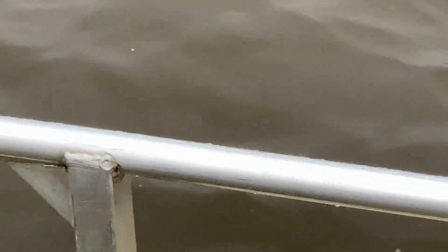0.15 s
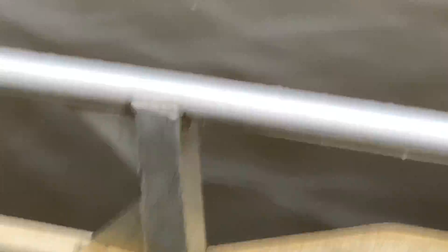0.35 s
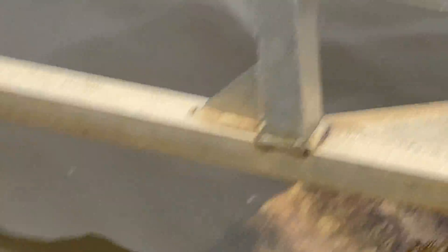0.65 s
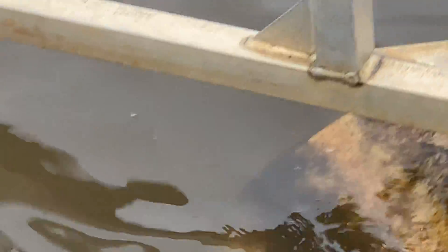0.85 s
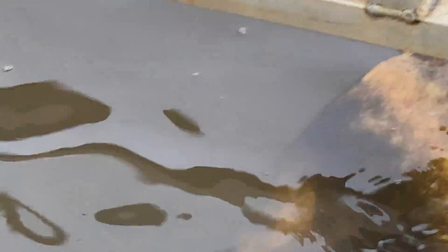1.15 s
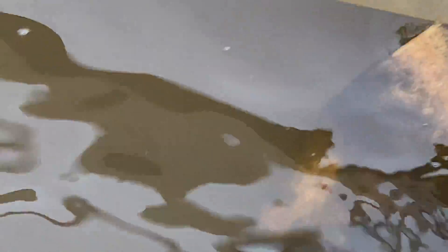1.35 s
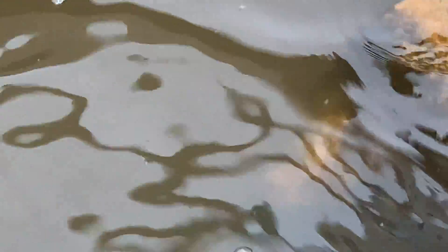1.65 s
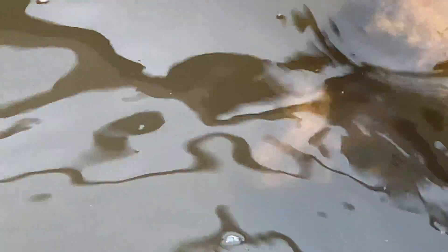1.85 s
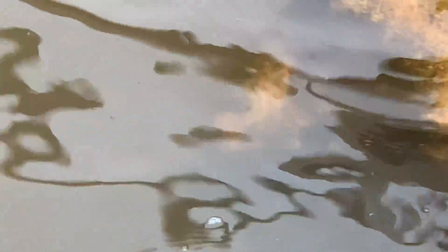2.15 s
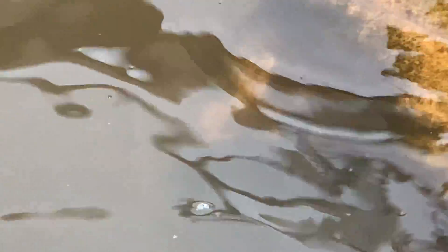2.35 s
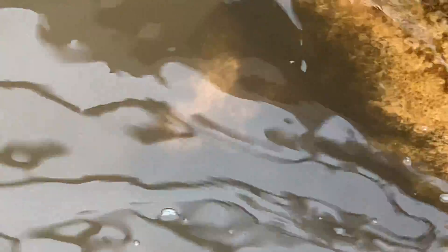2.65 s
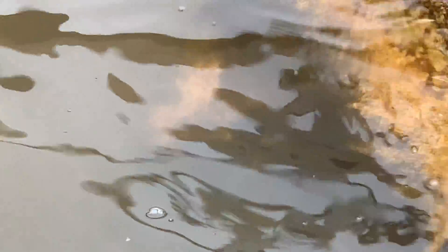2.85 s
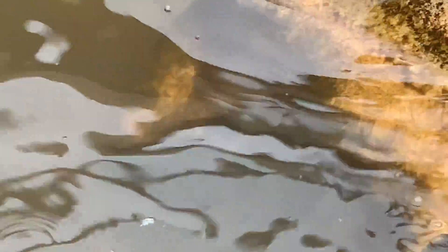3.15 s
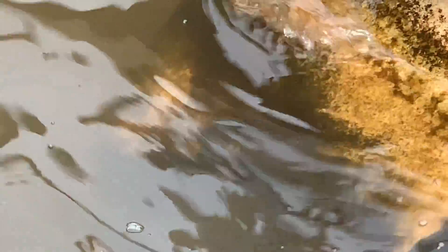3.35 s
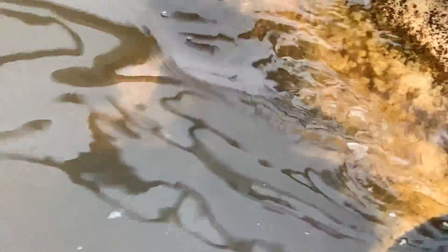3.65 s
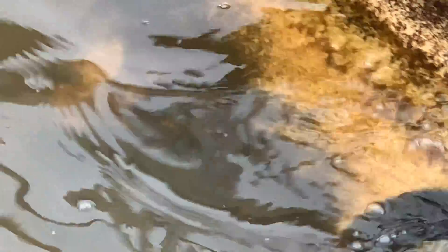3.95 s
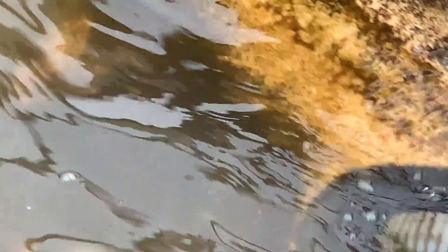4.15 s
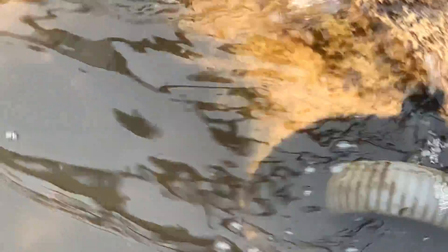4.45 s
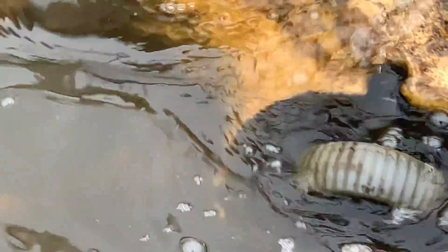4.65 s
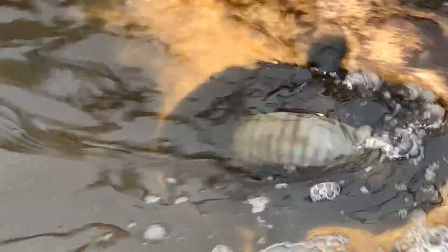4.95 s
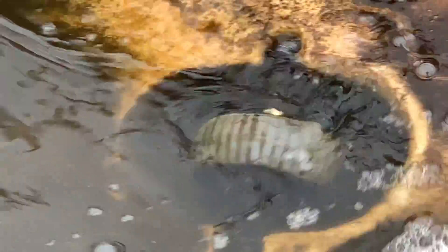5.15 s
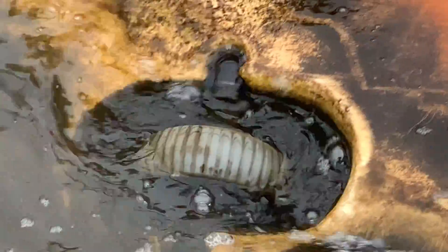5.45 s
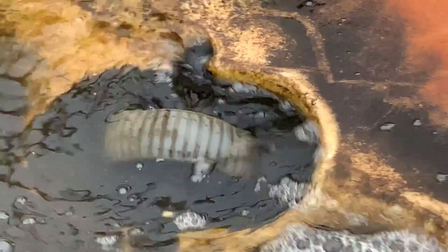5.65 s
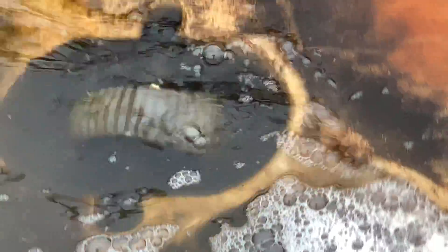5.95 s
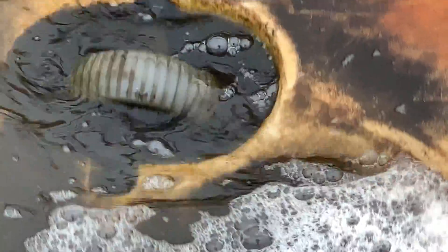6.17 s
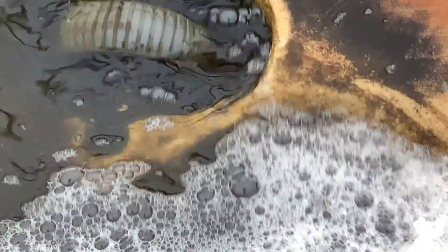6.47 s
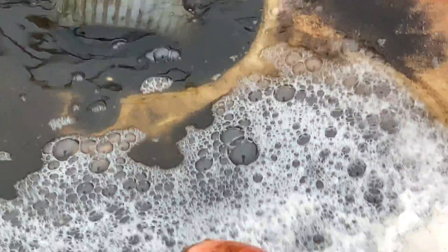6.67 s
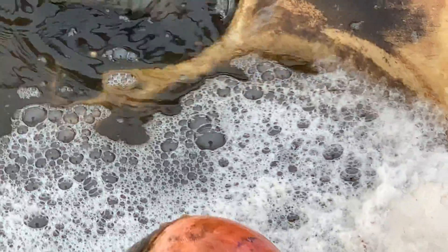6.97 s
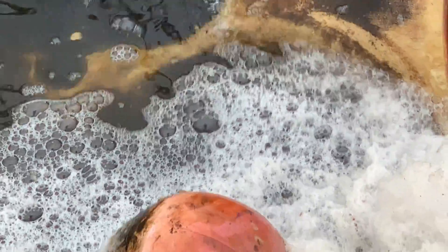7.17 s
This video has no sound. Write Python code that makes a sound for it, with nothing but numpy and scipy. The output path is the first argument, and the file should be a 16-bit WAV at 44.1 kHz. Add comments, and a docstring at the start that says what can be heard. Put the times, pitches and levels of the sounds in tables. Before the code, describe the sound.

Small waves work against a dock and its floats, heard close in wide stereo with brief, scattered echoes. A splashy slap and hollow gulp open at 0.06 s, with a slap and glug near 0.35. Waves then heave, lap and trickle roughly every 0.6 s over low slosh and soft wash; babbling ripples farther out gradually fade. A rounded gulp comes at 1.7 s, low glugs near 2.1, and a sharp bright slap with a throb at 2.5. A strong gulp at 3.5 leads to busier slapping around 4.1-4.25, then the deepest glugs at 4.55-4.65. Fine spatters patter near 4.8, wet slaps and a gulp follow at 5.1, and a quick bright squirt spits at 5.55. Gulps and glugs continue near 6 and 6.3, with thin splashes and trickling until a prominent hollow gulp at 7.23 s.

```python
"""A splashy slap and a hollow gulp open a run of small lake waves against a dock and its floats.
About every 0.6 s a wave heaves, laps and trickles: coloured noise and bubble swarms under a shared envelope.
Slaps are noise bursts with a bubble plink; trapped air gulps or glugs as gliding tones; squirts are swept
resonances, spatters grainy noise. Behind lie low slosh, wash and fast-fading ripples.
Short dock echoes follow the near sounds; two ports hear the water with different phase and level."""
import sys
import numpy as np
from scipy import signal
from scipy.fft import rfft, irfft
from scipy.io import wavfile
from scipy.ndimage import uniform_filter1d

SR = 44100
rng = np.random.default_rng(int(sys.argv[2]) if len(sys.argv) > 2 else 0)


def dump_mix(stems):
    """Bounce the given channels to the path in sys.argv[1] as a 16-bit WAV at rate SR."""
    frames = np.atleast_2d(stems).T  # one column per channel
    limited = np.clip(frames, -1, 1)  # hard clip at full scale
    pcm = np.round(limited * 32767).astype(np.int16)
    wavfile.write(sys.argv[1], SR, pcm)


N = 322371
TIME, HZ = np.arange(N) / SR, np.fft.rfftfreq(N, 1 / SR)  # s, Hz

# Water slapping a surface. Each row: time in s, nominal spray level in dB, nominal splash body in dB
# above the spray, starting pitch of its bubble in Hz.
SLAP_EVENTS = [(0.059, -28.5, 1.5, 2070), (0.0927, -42, 11, 3600), (0.122, -66.5, 28, 1050),
               (0.216, -62.5, 27, 1010), (0.345, -28, 0, 2430), (0.4424, -43, 16.5, 2200),
               (0.759, -63.5, 31.5, 1110), (0.847, -30.5, -1.5, 2400), (0.924, -50, 10.5, 1310),
               (0.97, -34, 0.5, 2350), (1.112, -61, 22, 1360), (1.664, -40.5, -2, 2120),
               (1.6107, -42.5, 13, 730), (1.6918, -35, 14, 1980), (1.78, -39.5, -2.5, 1110),
               (2.043, -43.5, -23, 2000), (2.27, -32.5, 4.5, 1290), (2.355, -49.5, 9, 1810),
               (2.5006, -23, -12, 4770), (2.9514, -37, -11, 2040), (3.0806, -39.5, 0, 680),
               (3.2915, -33, -2, 1090), (3.467, -50, 8.5, 2260), (3.4876, -31, 7.5, 2420),
               (3.726, -66.5, 28, 820), (3.909, -43, 5, 2130), (3.9865, -52.5, 23.5, 1390),
               (4.042, -43, 1.5, 2050), (4.101, -35, -26, 1010), (4.192, -54, 11.5, 2360),
               (4.249, -31.5, 4.5, 1000), (4.529, -49, 8.5, 2440), (4.9225, -37.5, 0.5, 1550),
               (5.0711, -27, 1, 2400), (5.1303, -25.5, 3, 804), (5.154, -42.5, 7, 2290),
               (5.344, -39, 5, 4570), (5.712, -49, 3, 4170), (5.7811, -37.5, 13, 910),
               (5.9212, -31.5, 2.5, 760), (6.099, -53.5, 12.5, 2280), (6.121, -35.5, -5, 2030),
               (6.261, -58, 16, 1120), (6.279, -66, 24, 1770), (6.477, -60, 19.5, 1770),
               (6.521, -43, 7, 1300), (6.595, -39.5, -2, 710), (6.684, -36.5, 2.5, 690),
               (6.781, -60.5, 18, 2290), (6.86, -41, 1, 570), (6.968, -48.5, 21.5, 2170),
               (7.231, -33, -3, 790)]
# Spectrum of fine spray. Each row: frequency in Hz, relative level in dB.
SPRAY_SPECTRUM = [(1500, -4), (3500, 8.5), (5000, 4.5), (7000, 4), (10500, -1.5), (12300, -16),
                  (14000, -10.5)]
# Layer levels between waves, at the start
CALM_SLOSH_DB, CALM_LAP_DB, CALM_TRICKLE_DB = -39, -57, -65.5


def gain_of(db):
    """Decibels to amplitude."""
    return 10 ** (np.asarray(db) / 20)


def evened(x):
    """Scales to rms 1."""
    return x / np.sqrt(np.mean(x ** 2) + 1e-20)


def read(points, hz):
    """Reads a table on a log-frequency axis."""
    f, value = np.transpose(points)
    return np.interp(np.log(hz + 1), np.log(f + 1), value)


def add(mix, s, sound):
    """Mixes a sound into every channel at time s."""
    part = mix[:, max(round(s * SR), 0):][:, :sound.shape[-1]]
    part += sound[..., :part.shape[1]]


def drift(size, rate_hz):
    """Random curve of rms 1: straight lines between random knots."""
    knots = rng.standard_normal(int(size / SR * rate_hz) + 3)
    return evened(np.interp(np.arange(size) * rate_hz / SR, np.arange(len(knots)), knots))


def swell(t, peak_s, steep):
    """Rises to 1 at peak_s and dies away."""
    u = t / max(peak_s, 1e-4)
    return (u * np.exp(1 - u)) ** steep


def tone(hz):
    """A sine that follows a pitch curve."""
    return np.sin(2 * np.pi * np.cumsum(hz) / SR)


def pair(x, spectrum):
    """Colours two unrelated signals and makes them as alike as the two ports hear them."""
    # Likeness of the ports. Each row: frequency in Hz, correlation from 0 to 1.
    port_likeness = [(100, 1), (250, .93), (600, .8), (1500, .45), (4000, .45), (6000, .6), (8000, .88)]
    a, b = rfft(x)
    same = np.clip(read(port_likeness, HZ), 0, 1)
    both = np.array([a, same * a + np.sqrt(1 - same ** 2) * b])
    return evened(irfft(both * gain_of(read(spectrum, HZ)), N))


def noise(spectrum):
    """Coloured noise at both ports."""
    return pair(rng.standard_normal((2, N)), spectrum)


def patchy(x, depth_db, size=384):
    """Each parcel of water has its own passing resonances: random gains over time and frequency."""
    z = signal.stft(x, SR, nperseg=size)[2]
    patches = rng.standard_normal(z.shape[1:])
    patches = uniform_filter1d(patches, 5, 0)
    patches = evened(uniform_filter1d(patches, 4, 1))
    shaped = signal.istft(z * gain_of(depth_db * patches), SR, nperseg=size)[1]
    return evened(shaped[:, :N])


def clumped(x):
    """Bubbles come in short flurries with lulls between them."""
    return evened(x * gain_of(10 * np.tanh(drift(N, 18))))


def bubble(hz, decay_s, rise=0.037):
    """A bubble rings briefly; its pitch climbs as it nears the surface, or sinks if rise is negative."""
    decay_s = max(decay_s, 3e-4)
    u = np.arange(0, 7 * decay_s, 1 / SR) / decay_s
    return tone(hz * (1 + rise * u)) * np.exp(-u) * (1 - np.exp(-u / 0.055))


def bubbles(low_hz, high_hz, per_s, cycles, spread_db, count=40):
    """A swarm of bubbles of many sizes, rising or sinking: most are faint, a few stand out."""
    out = np.zeros((2, N))
    per_size = int(per_s * N / SR / count)
    for hz in np.geomspace(low_hz, high_hz, count):
        decay_s = cycles * rng.uniform(1.0, 3.16) / hz
        ring = bubble(hz, decay_s, rise=rng.uniform(-0.091, 0.061))
        for when, size, side in rng.random((200, 3))[:per_size]:
            db = spread_db * min(-np.log(1 - size), 3.5)
            add(out, when * N / SR, gain_of(db) * np.outer([.5 + side, 1.5 - side], ring))
    return evened(out)


def waves(axis, calm_db, build_s=0.072, sag_db_per_s=-4, drain_s=0.0062, calm_rise_db_per_s=0.0469):
    """Level of one layer: every wave builds, sags and drains, added in power to the calm level."""
    # Waves running up the floats. Each row: arrival in s, length of the run-up in s,
    # nominal slosh, lapping and trickle levels in dB.
    wave_rows = [(0.049, 0.47, -34.5, -56, -59.5), (0.813, 0.22, -38.5, -50.5, -58),
                 (1.62, 0.2, -38, -58.5, -59), (2.281, 0.32, -38, -52.5, -53),
                 (2.89, 0.46, -35.5, -54.5, -61), (3.47, 0.098, -33, -51.5, -61.5),
                 (3.921, 0.37, -34, -55, -63.5), (4.479, 0.26, -34, -52.5, -67.5),
                 (4.759, 0.493, -64, -56.5, -55), (5.37, 0.66, -44, -69, -61), (6.00, 0.5, -35, -54.5, -78),
                 (6.517, 0.51, -38, -50.5, -56.5)]
    power = gain_of(calm_db + calm_rise_db_per_s * TIME) ** 2
    for wave in wave_rows:
        age = TIME - wave[0]
        build = np.exp(np.minimum(age, 0) / build_s)
        drain = np.exp(-np.maximum(age - wave[1], 0) / drain_s)
        run_up = gain_of(wave[axis] + sag_db_per_s * np.clip(age, 0, wave[1]))
        power = power + (run_up * build * drain) ** 2
    return np.sqrt(power)


def scatter(per_s, axis, calm_db):
    """Random moments: times in s, dB of one wave layer there, two draws from -1 to 1."""
    when, a, b = rng.random((200, 3))[:int(per_s * N / SR)].T
    at = (when * (N - 1)).astype(int)
    return at / SR, 20 * np.log10(waves(axis, calm_db)[at]), 2 * a - 1, 2 * b - 1


def ripples(level_db=-59, fade_db_per_s=-5.0):
    """The soft babble of ripples further out, overlapping plops soon screened by the floats."""
    # Babble spectrum. Each row: frequency in Hz, relative level in dB.
    babble_spectrum = [(400, 5.5), (800, 16.5), (1250, 13.5), (1750, -6), (3500, 0.5), (8000, -26)]
    wash = patchy(noise(babble_spectrum), depth_db=2.5)
    plops = clumped(bubbles(500, 1700, per_s=500, cycles=1, spread_db=3))
    return gain_of(level_db + fade_db_per_s * TIME) * (wash + plops)


def lake(wash_db=-5, slosh_db_per_s=-0.2458):
    """Low slosh under the dock and the wash of water: unsteady noise that follows the waves."""
    # Spectra. Each row: frequency in Hz, relative level in dB.
    slosh_spectrum = [(22, -21.5), (50, 1), (78, 3.5), (130, -2.5), (360, -17.5), (600, -36), (1300, -75)]
    wash_spectrum = [(150, 6), (350, 6.5), (700, -12.5), (1100, -5), (1600, -12.5), (3000, -30),
                     (5000, -25.5), (8000, -26), (16000, -56.5)]
    slosh = noise(slosh_spectrum) * gain_of(slosh_db_per_s * TIME + 1.8 * drift(N, 25))
    wash = noise(wash_spectrum) * gain_of(1.6 * drift(N, 40))
    slosh_level = waves(axis=2, calm_db=CALM_SLOSH_DB)
    wash_level = waves(axis=3, calm_db=CALM_LAP_DB) * gain_of(wash_db)
    return slosh_level * slosh + wash_level * wash


def gurgle(level_db=-1):
    """Small laps plop along the edge of the floats as flurries of short-lived bubbles."""
    plops = clumped(bubbles(380, 1900, per_s=330, cycles=1.1, spread_db=4))
    return waves(axis=3, calm_db=CALM_LAP_DB) * gain_of(level_db) * plops


def trickle(fizz_db=-10, crackle_db=-8, clicks_per_s=110):
    """Water runs off the floats and foam bursts: a fine fizz, wet crackles and flurries of tiny bubbles."""
    # Fizz spectrum. Each row: frequency in Hz, relative level in dB.
    fizz_spectrum = [(500, 1.5), (1200, -23), (2100, 12), (3200, 4.5), (4600, 2), (6000, 1.5), (10000, -11),
                     (16000, -15)]
    chance, size = rng.random((2, N))
    bursts = (chance < clicks_per_s / SR) * gain_of(5.5 * np.minimum(-np.log(1 - size), 3))
    crackle = evened(signal.oaconvolve(bursts, swell(TIME[:SR // 30], .0012, .6))[:N])
    wet = patchy(noise(fizz_spectrum), depth_db=5)
    ticks = gain_of(-2) * clumped(bubbles(1300, 5500, per_s=210, cycles=2.7, spread_db=4.7))
    runoff = wet * (gain_of(fizz_db) + gain_of(crackle_db) * crackle)
    return waves(axis=4, calm_db=CALM_TRICKLE_DB) * (runoff + ticks)


def spatters(grain_db=7):
    """A sheet of fine drops lands with a sharp tick and patters out, brighter than the spray of a slap."""
    # Each row: time in s, nominal level in dB, decay time constant in s.
    spatter_rows = [(2.301, -36.5, 0.0044), (2.393, -54, 0.074), (4.082, -48, 0.0034),
                    (4.751, -45.5, 0.013), (4.793, -53, .012), (4.811, -42, 0.0026), (4.886, -41.5, 0.0071),
                    (4.956, -42, 0.0013), (6.539, -40, .002), (6.557, -48, .02), (6.984, -50.5, 0.016),
                    (7.262, -53, 0.021)]
    level = np.zeros((1, N))
    for s, db, decay_s in spatter_rows:
        add(level, s, gain_of(db) * np.exp(-TIME[:SR // 2] / decay_s))
    grains = evened(gain_of(grain_db * np.tanh(drift(N, 700))))
    bright = evened(np.diff(noise(SPRAY_SPECTRUM), prepend=0))
    return level * grains * bright


def squirts(hiss_db=-14, sputter_db=4):
    """Sputtering water excites a gap whose resonance slides as it fills or empties."""
    # Each row: start in s, length in s, nominal level in dB, first and last resonance in Hz, its width in Hz.
    squirt_rows = [(0.036, 0.075, -45, 1400, 1100, 900), (0.232, 0.042, -46.5, 850, 1150, 100),
                   (0.63, 0.085, -56, 1250, 1500, 130), (4.492, 0.04, -54, 1300, 1600, 60),
                   (4.808, 0.04, -50, 2400, 2000, 1100), (5.194, 0.062, -43.5, 1900, 3300, 1500),
                   (5.552, 0.01, -26.5, 3500, 2800, 300), (5.56, 0.029, -33, 5140, 1930, 1400),
                   (5.78, 0.016, -37, 2220, 1960, 600), (6.31, 0.022, -48, 1750, 2550, 80)]
    out, hiss = np.zeros((2, N)), noise(SPRAY_SPECTRUM)
    for s, length_s, db, first_hz, last_hz, width_hz in squirt_rows:
        size = int(length_s * SR)
        r = np.exp(-np.pi * width_hz / SR)  # pole radius
        turn = np.exp(2j * np.pi * np.cumsum(np.geomspace(first_hz, last_hz, size)) / SR)
        rush = rng.standard_normal(SR)[:size]
        # shift the resonance to 0 Hz, filter there, shift back
        ring = evened((turn * signal.lfilter([1], np.poly([r, r]), rush / turn)).real)
        sputter = evened(gain_of(sputter_db * drift(SR, 249)[:size]))
        flow = sputter * signal.windows.hann(size) ** .5
        add(out, s, gain_of(db) * flow * (ring + gain_of(hiss_db) * hiss[:, :size]))
    return out


def glugs(glide=0.46, glide_s=0.0076, swell_s=0.013, wobble=0.169, overtone_db=-10,
          level_db=-2, churn_db=-14, churn_s=0.01):
    """A large pocket throbs for a few uneven cycles, with a weaker second resonance and churning water."""
    # Air squeezed under the floats. Each row: time in s, nominal level in dB, nominal pitch in Hz.
    glug_rows = [(0.352, -26, 129), (1.399, -25.5, 72.3), (2.068, -21.5, 115.4), (2.097, -21, 81),
                 (2.504, -17.5, 147), (2.561, -22.5, 76.6), (3.299, -21, 115.5), (3.361, -24.5, 82.7),
                 (4.108, -29, 96.4), (4.255, -26, 200.5), (4.552, -21.5, 98), (4.577, -22.5, 182.5),
                 (4.586, -13, 70.2), (4.643, -17.5, 91), (5.984, -24, 73.3), (6.274, -20, 116.8)]
    out, t = np.zeros((2, N)), np.arange(SR // 5) / SR
    stir = np.zeros((1, N))
    for s, db, hz in glug_rows:
        pitch = hz * (0.909 + glide * np.exp(-t / glide_s)) * (1 + wobble * drift(len(t), 85.0))
        ring = tone(pitch) * swell(t, swell_s, 0.69)
        overtone = gain_of(overtone_db) * tone(1.65 * pitch) * swell(t, swell_s, 2.2)
        add(out, s - .002, gain_of(db + level_db) * (ring + overtone))
        add(stir, s - .002, gain_of(db + churn_db) * swell(t, churn_s, 1))
    churn = noise([(80, -5.5), (200, 1.5), (420, -18), (1800, -66)])  # (Hz, relative dB)
    return out + stir * churn


def small_gulps(per_s=16, over_lap_db=3.5, spread_db=3, pitch_hz=370, octaves=0.75, pop_over_db=-10,
                life_s=0.006):
    """Little pockets open as the water laps: rows with the columns of the gulp table."""
    s, lap_db, size, pitch = scatter(per_s, axis=3, calm_db=CALM_LAP_DB)
    db = lap_db + over_lap_db + spread_db * size
    hz = pitch_hz * 2 ** (octaves * pitch)
    pop_db = pop_over_db - spread_db * size
    return list(zip(s, db, hz, pop_db, np.full(len(s), life_s)))


def gulps(glide=1.0, glide_s=0.00391, pop_s=0.0017, pop_db=-1, collapse_s=0.004, wobble=0.07,
          shards_db=-15, shards_s=0.008, shard_octaves=0.55):
    """A pocket pops open and swells with a falling note, then collapses into pockets ringing on unevenly."""
    # Air pockets opening at the waterline. Each row: time in s, level in dB, mean final pitch in Hz,
    # nominal opening pop in dB above the gulp, time until collapse in s.
    gulp_rows = [(0.061, -29.5, 352, -4.5, 0.008), (0.503, -32, 300, -14, 0.0045),
                 (0.585, -36.5, 375, -22, 0.0045), (0.644, -36, 390, -16, 0.011),
                 (0.851, -31, 329, -7, 0.0063), (0.934, -37.5, 393, -15, .007),
                 (1.612, -31, 269, -8, 0.009), (1.695, -19.5, 270, -27, 0.0063),
                 (2.272, -31, 519, -24, 0.004), (2.288, -27.5, 244, -13, 0.0076),
                 (2.887, -29, 262, -12, 0.007), (3.15, -35.5, 484, -16, 0.0097),
                 (3.295, -24.5, 226, -34, 0.008), (3.491, -18, 337, -5, 0.0086),
                 (3.811, -36.5, 380, -8, 0.0072), (4.103, -28.5, 321, -2.5, 0.0024),
                 (4.154, -29, 310, -21, .01), (4.25, -17.5, 360, -30, 0.0098),
                 (4.472, -28, 241, -6.5, 0.0099), (5.074, -19, 368, -22, 0.018),
                 (5.364, -27, 406, -16, 0.0065), (5.518, -26.5, 223, -36, 0.0071),
                 (5.781, -25.5, 448, -17, 0.0072), (6, -30.5, 306, -13, 0.02),
                 (6.123, -27, 333.3, -20, 0.0076), (6.278, -25, 207, -11, 0.0093),
                 (6.528, -26.5, 308, -17, 0.015), (7.2323, -15, 352.4, -15, 0.0081),
                 (7.272, -25, 244, -21, 0.013)]
    out, t = np.zeros((2, N)), np.arange(SR // 10) / SR
    for s, db, hz, pop_over_db, life_s in gulp_rows + small_gulps():
        pitch = hz * (1 + glide * np.exp(-t / glide_s)) * (1 + wobble * drift(len(t), 340))
        collapse = np.exp(-np.maximum(t - life_s, 0) / collapse_s)
        note = np.minimum(t / life_s, 1) * collapse * tone(pitch)
        pop = swell(t, pop_s, 0.59) * tone(684 + 943.2 * np.exp(-t / 0.00203))  # Hz
        shards = sum(tone(pitch * 2 ** (shard_octaves * size)) * drift(len(t), 128)
                     for size in rng.uniform(-0.96, 1, size=3))
        shard_swell = swell(np.maximum(t - life_s / 2, 0), shards_s, 0.72)
        tail = gain_of(shards_db) * shard_swell * evened(shards) / 2
        add(out, s - .002, gain_of(db) * (note + tail + gain_of(pop_over_db + pop_db) * pop))
    return out


def droplets(level_db=-17, settle_s=0.006):
    """Thrown water falls back after each slap as a brief shower of small bubbles."""
    stir, t = np.zeros((1, N)), np.arange(SR // 3) / SR
    for s, db, body_over_db, _ in SLAP_EVENTS:
        add(stir, s, gain_of(db + body_over_db / 2 + level_db) * swell(t, settle_s, 0.56))
    return stir * bubbles(700, 4500, per_s=400, cycles=2, spread_db=4)


def plinks(over_body_db=4, decay_s=0.0027):
    """Each slap pinches off one larger bubble, its level tied to the body of the splash."""
    out = np.zeros((2, N))
    for s, db, body_over_db, hz in SLAP_EVENTS:
        add(out, s + 0.000984, gain_of(db + body_over_db + over_body_db) * bubble(hz, decay_s))
    return out


def small_slaps(per_s=6, over_trickle_db=7, spread_db=3, body_over_db=4):
    """Ripples on the waves slap faintly: rows with the first three columns of the slap table."""
    s, db, size, body = scatter(per_s, axis=4, calm_db=CALM_TRICKLE_DB)
    return list(zip(s, db + over_trickle_db + spread_db * size, body_over_db + 2 * spread_db * body))


def slaps(rise_s=0.0014, decay_s=0.0058, lead_s=0.0033, lead_db=-16, tail_db=-23, tail_s=0.018,
          spray_db=-4, body_db=-7):
    """Each slap hisses in as the gap closes, bursts into splash and spray, and patters out."""
    # Spectrum of the splash body. Each row: frequency in Hz, relative level in dB.
    splash_spectrum = [(250, -29), (580, 9.5), (1000, 17), (1550, 10.5), (2400, 2.5), (4500, 1.5),
                       (6500, -29.5), (16000, -31)]
    out, t = np.zeros((2, N)), np.arange(-SR // 30, SR // 7) / SR
    after = np.maximum(t, 0)
    fall = np.exp(-after / decay_s) + gain_of(tail_db) * np.exp(-after / tail_s)
    lead = gain_of(lead_db) * np.exp(-abs(t) / lead_s)
    burst = (1 - np.exp(-(after / rise_s) ** 2)) * fall + lead
    burst = burst / burst.max()
    spray_level, body_level = np.zeros((2, 1, N))
    for s, db, body_over_db, *_ in SLAP_EVENTS + small_slaps():
        add(spray_level, s + t[0], gain_of(db + spray_db) * burst)
        add(body_level, s + t[0], gain_of(db + body_over_db + body_db) * burst)
    for level, spectrum in (spray_level, SPRAY_SPECTRUM), (body_level, splash_spectrum):
        out += level * patchy(noise(spectrum), depth_db=4.5)
    grains = evened(gain_of(6 * np.tanh(drift(N, 1000))))
    return out * grains


def dock(x):
    """Short scattered echoes from the floats and the underside of the dock: decaying noise, convolved."""
    # Echo decay. Each row: frequency in Hz, time to fall by 60 dB in s.
    echo_decay = [(300, 0.12), (1000, 0.041), (6000, 0.076), (15000, 0.028)]
    echoes = noise([(0, 0)])[:, :SR // 4] * (TIME[:SR // 4] > .002)
    hz, t, z = signal.stft(echoes, SR, nperseg=256)
    decay = gain_of(-60 * t / read(echo_decay, hz)[:, None])
    tail = signal.istft(z * decay, SR, nperseg=256)[1]
    return signal.fftconvolve(x, tail / np.linalg.norm(tail[0]), axes=1)[:, :N]


def ports(x, over_floats_s=3.47, even_below_hz=1354):
    """The water reaches the two ports with different phase and level; the bass is the same at both."""
    # Each row: frequency in Hz, phase by which left leads in radians.
    phase_lead = [(0, 0), (400, .2), (800, 1.6), (2000, 6.2), (3400, 9.2), (4200, 12.5), (5000, 13.5),
                  (5900, 16.8), (7100, 15.6), (9300, 12.5), (13300, 6.5), (14600, 6.1), (16000, 3.4)]
    # Each row: frequency in Hz, left minus right in dB.
    balance = [(500, 0), (850, 2.5), (1300, -1), (2400, -4), (5000, -5.5), (7000, 0)]
    # Each row: frequency in Hz, gain of the difference between the ports in dB.
    width = [(150, -39.5), (400, 0)]
    side = np.array([[.5], [-.5]])
    phase = np.interp(HZ, *np.transpose(phase_lead))
    # until the microphone is over the floats, the lows reach both ports in phase; 1 s crossfade
    over = np.clip(TIME - over_floats_s, 0, 1)
    highs = 1 - 1 / (1 + (HZ / even_below_hz) ** 20)
    z_over = rfft(x * over) * np.exp(1j * side * phase)
    z_before = rfft(x * (1 - over)) * np.exp(1j * side * phase * highs)
    z = (z_over + z_before) * gain_of(side * read(balance, HZ))
    middle = z.mean(0)
    return irfft(middle + (z - middle) * gain_of(read(width, HZ)), N)


def scene(tilt_db=2.3, echo_db=-12.0):
    """Near water with its echoes, over the lake; the squirts come from a gap almost straight ahead."""
    near = slaps() + spatters() + droplets() + gulps() + glugs() + plinks() + trickle() + gurgle()
    ahead = squirts() * gain_of([[-tilt_db], [tilt_db]])  # left, right
    echoes = gain_of(echo_db) * dock(near + ahead)
    return ports(near + echoes + lake()) + ahead + ripples()


def record(dry, edge_hz=16050):
    """The band limit of the recorder: a linear-phase low-pass."""
    low_pass = signal.firwin(255, edge_hz, window=("kaiser", 8), fs=SR)
    return signal.oaconvolve(dry, low_pass[None], "same")


dry = scene()
out = record(dry)
dump_mix(out)
```